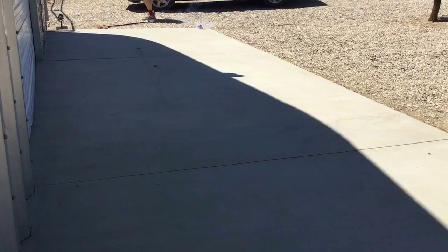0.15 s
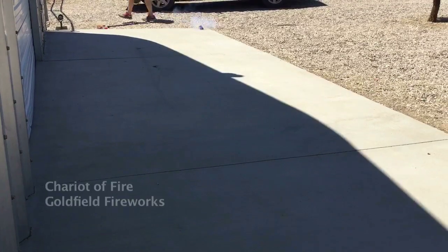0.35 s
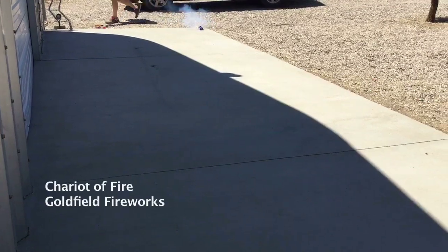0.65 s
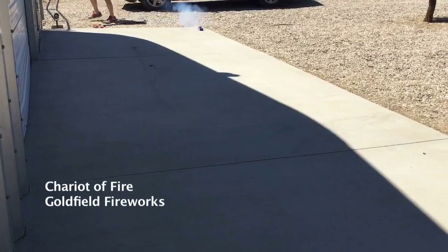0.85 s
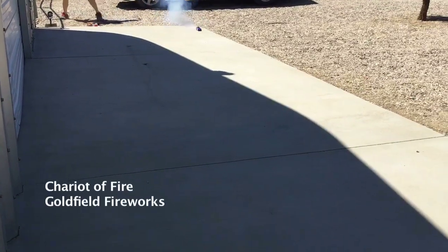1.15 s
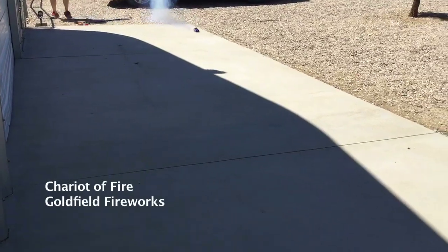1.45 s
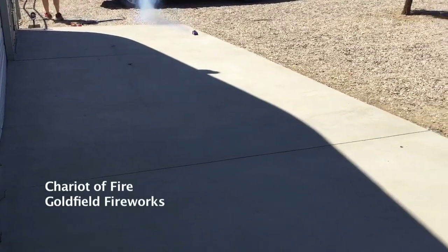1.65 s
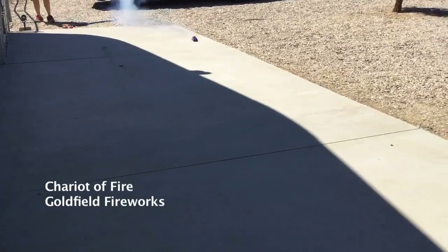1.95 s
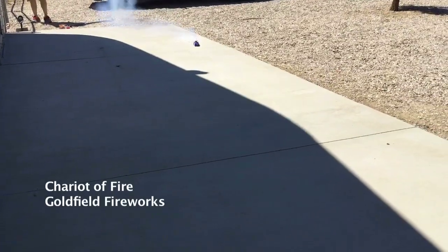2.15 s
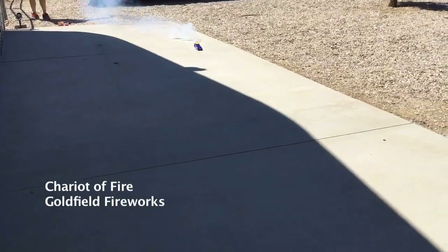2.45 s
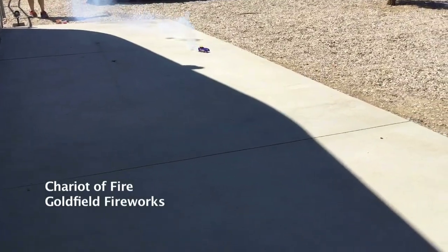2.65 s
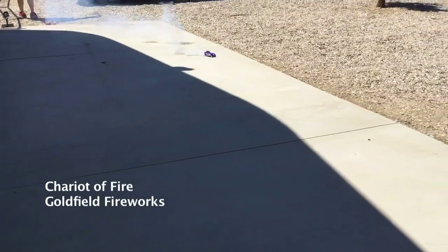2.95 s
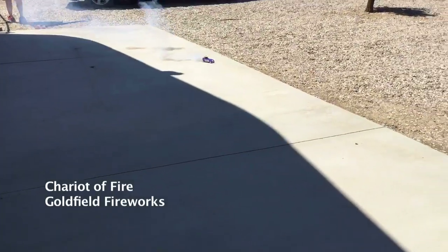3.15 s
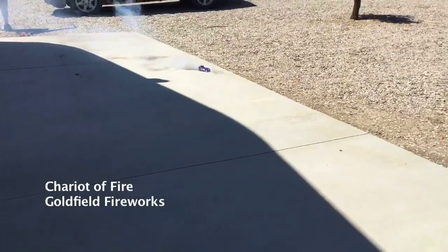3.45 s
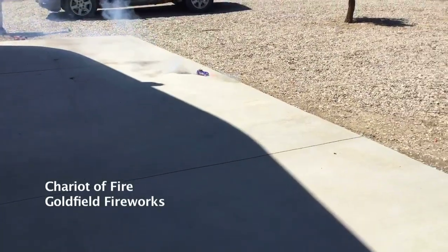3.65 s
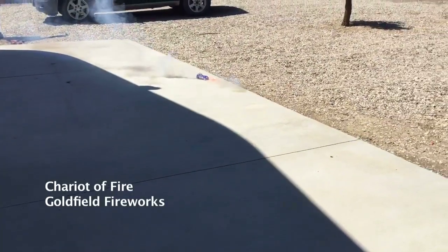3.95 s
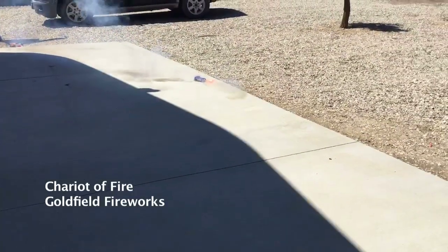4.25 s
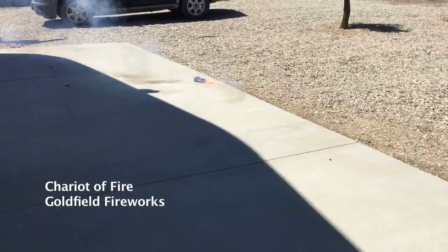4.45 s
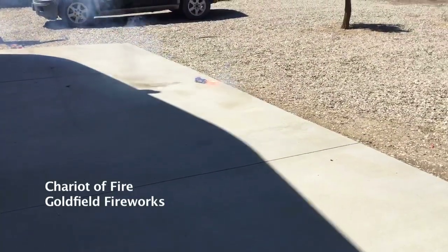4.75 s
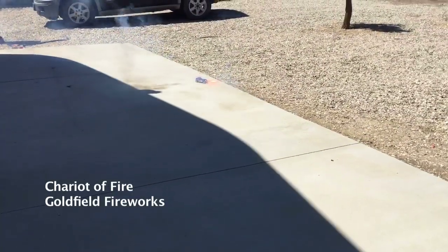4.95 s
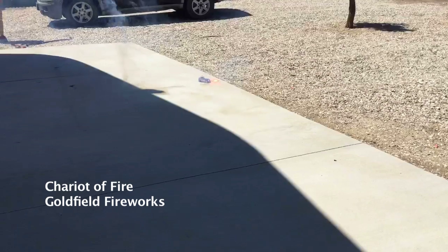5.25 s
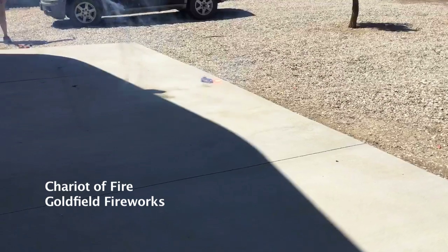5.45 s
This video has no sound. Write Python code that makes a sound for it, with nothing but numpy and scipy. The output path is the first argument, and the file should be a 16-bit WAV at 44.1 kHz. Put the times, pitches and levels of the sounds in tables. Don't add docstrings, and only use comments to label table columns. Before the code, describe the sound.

Loud, rough firework whistle falls in pitch for two seconds and stops short, leaving echoes, faint gas hiss, small pops, wind buffets and late bird chirps.

```python
import sys
import numpy as np
from scipy import signal
from scipy.fft import rfft, irfft, next_fast_len
from scipy.io import wavfile
from scipy.ndimage import uniform_filter1d

SR = 44100
rng = np.random.default_rng(int(sys.argv[2]) if len(sys.argv) > 2 else 0)


def volts_from_db(level):
    exponent = np.asarray(level, float) / 20
    return 10 ** exponent


def transcribe(signal):
    frames = np.atleast_2d(signal).T
    limited = np.clip(frames, -1, 1)
    pcm = np.round(limited * 32767).astype(np.int16)
    wavfile.write(sys.argv[1], SR, pcm)


N = 246492
T = np.arange(N) / SR
LIT_S, CHOKE_S, OUT_S = .105, 2.052, 2.095


def curve(table, silent=None):
    s, *columns = np.transpose(table)
    return [np.interp(T, s, c, silent, silent) for c in columns]


def unit(x):
    return x / np.sqrt(np.mean(x ** 2))


def colour(x, shape):
    hz, db = np.transpose(shape)
    bins = np.arange(len(x) // 2 + 1) * SR / len(x) + 1
    gain = volts_from_db(np.interp(np.log(bins), np.log(hz), db))
    return irfft(rfft(x) * gain, len(x))


def walk(rate):
    hold = int(SR / rate)
    steps = np.repeat(rng.standard_normal(N // hold + 1), hold)
    return unit(uniform_filter1d(uniform_filter1d(steps, hold), hold)[:N])


def bumps(rows):
    return sum(size * np.exp(-((T - s) / width) ** 2) for s, size, width in rows)


def spurt(start, length, sag_db, attack, release):
    t = T - start
    rise = np.clip(t / attack, 0, 1)
    sag = volts_from_db(-sag_db * np.clip(t / length, 0, 1))
    return rise * sag * np.exp(-np.maximum(t - length, 0) / release)


def turbulence(shape, flicker_db, rate):
    out = 0
    for hz in 30 * 2. ** np.arange(10):
        octave = [(hz / 2, -60), (hz / 1.6, -9), (hz / 1.25, 0),
                  (hz * 1.25, 0), (hz * 1.6, -9), (hz * 2, -60)]
        band = colour(rng.standard_normal(N), octave)
        out = out + band * volts_from_db(flicker_db * walk(rate))
    return unit(colour(out, shape))


# [f/Hz, level/(dB per Hz)]
STREET_HISS = [(300, -8), (800, -4), (3000, 0), (6500, -14), (11000, -10.5), (14000, -24.5), (15700, -38)]


def street():
    return volts_from_db(-57.5) * turbulence(STREET_HISS, 0.97, 6.6)


# [t/s, level/dB, deep part minus level/dB]
GUSTS = [(0, -49, 6), (.85, -46, 3.5), (1.05, -49, -17.5), (2, -49.5, -11.5), (2.7, -47, -1),
         (3.8, -47.5, -7), (4.2, -41.5, -14), (4.9, -44.5, -5.5), (5.1, -41, -9), (5.35, -45, -11),
         (5.59, -42.5, -13)]
# [f/Hz, level/(dB per Hz)]
WIND_RUMBLE = [(25, -35.5), (50, -7.5), (100, -2.5), (161, -1), (287, -3.5), (386, -13), (450, -20.5),
               (800, -36.5)]
# [t/s, peak level/dB, f/Hz]
BUFFETS = [(1.622, -39, 58.4), (1.907, -42, 51.1), (2.075, -31.5, 178), (2.776, -35, 81),
           (3.254, -29.5, 80), (3.726, -27, 103), (3.745, -25.5, 79.5), (3.914, -29.5, 57.7),
           (4.549, -33.5, 108), (4.769, -32, 156.6), (5.12, -28, 61.9), (5.348, -29.5, 64.2),
           (5.461, -28.5, 180), (5.561, -29.5, 110.3)]


def wind():
    gust_db, deep_db = curve(GUSTS)
    rumble = turbulence(WIND_RUMBLE, 2.3, 12)
    deep = turbulence([(25, -25), (60, 0), (110, -6), (200, -30)], 2.0, 10)
    out = volts_from_db(gust_db) * (rumble + volts_from_db(deep_db - 9.5) * deep)
    for s, db, hz in BUFFETS:
        turns = (T - s) * hz
        out = out + volts_from_db(db) * np.sin(2 * np.pi * turns) * np.exp(-((turns - .6) / 0.77) ** 2)
    return out


# [t/s, length/s, centre f/Hz, swing f/Hz, level/dB]
CHIRPS = [
    (4.79, .075, 3020, 400, -57),
    (5.43, .054, 4200, 850, -52),
    (5.49, .04, 3350, 500, -54),
]


def bird():
    swing_turns, settle_share, glide_db = 1.17, .35, -8
    out = 0
    for s, length, centre_hz, swing_hz, db in CHIRPS:
        u = np.clip((T - s) / length, 0, 1)
        angle = 2 * np.pi * swing_turns * u
        hz = centre_hz - swing_hz * (1 - settle_share * u) * np.cos(angle)
        level = volts_from_db(db + 2.0 * walk(150) + glide_db * np.sin(angle) ** 2)
        swell = np.sin(np.pi * u ** 1.44) ** 0.53 * (u < 1)
        out = out + level * swell * np.sin(2 * np.pi * np.cumsum(hz) / SR)
    return out


# [t/s, peak level/dB, centre f/Hz]
SPARKS = [(.106, -30, 900), (.111, -22, 1600), (.122, -22, 1700), (2.066, -30, 1500), (2.072, -33, 500),
          (2.081, -31, 350), (2.092, -35, 300), (2.27, -40, 2000), (2.297, -34, 6000), (2.357, -28, 5000),
          (2.416, -33, 2600), (2.432, -37, 4000), (2.455, -39, 4000), (2.51, -39, 2500), (2.57, -32, 1800),
          (2.645, -32, 1700), (2.68, -33, 1900), (2.757, -38, 2000), (2.83, -37, 3000), (3.005, -39, 3000),
          (3.335, -34, 8000), (3.695, -36, 1800), (4.357, -30, 1300), (4.57, -39, 1500)]


def sparks():
    out = np.zeros(N)
    t = T[:SR // 50]
    for s, db, hz in SPARKS:
        burst = rng.standard_normal(len(t)) * np.exp(-t / .0014)
        pop = colour(burst, [(hz / 8, -40), (hz / 3, -8), (hz, 0), (hz * 2.2, -8), (hz * 6, -40)])
        out[int(s * SR):][:len(t)] += volts_from_db(db) * pop / np.abs(pop).max()
    return out


# [f/Hz, level/(dB per Hz)]
ROAR = [(200, -14), (560, 0), (900, -2.5), (1700, -3.5), (2900, -15.5), (4000, -13.5), (8000, -30.5),
        (12000, -55.5)]
# [f/Hz, level/(dB per Hz)]
HISS = [(1200, -31.5), (2500, -13), (4200, -6.5), (5200, -8), (6300, -4), (7500, -10), (9000, -11),
        (11400, -5), (13000, -18), (14500, -19), (15700, -46)]
# [f/Hz, level/(dB per Hz)]
FLAME = [(150, -15), (400, -17), (1000, -2), (2000, -0.5), (3500, 8), (6000, 0), (8500, -10), (11000, -8.5),
         (14000, -22.5), (15700, -33)]
# [t/s, length/s, roar level/dB, hiss level/dB, sag/dB]
SPURTS = [(-.05, 2.03, -58.5, -52, -4), (2.163, 0.28, -64.5, -63, -9.5), (2.474, 0.051, -55.5, -51.5, -3),
          (2.527, .49, -57, -50, 0.5), (3.027, 0.059, -61, -49.5, -8.5), (3.092, 0.28, -48, -39.5, 12),
          (3.323, 0.21, -52, -45.5, 5.5), (3.51, 0.11, -51.5, -43, 1), (3.681, 0.064, -41.5, -57.5, 2.5),
          (3.82, 0.75, -42, -59, 8), (4.597, 0.44, -57.5, -59, 1.5), (5.1, .4, -60, -69.5, 0.5),
          (5.54, .06, -56, -73, 1)]


def jet():
    flows = np.array([spurt(s, length, sag_db, .035, .055) for s, length, _, _, sag_db in SPURTS])
    roar_gain, hiss_gain = np.sqrt(volts_from_db(np.transpose(SPURTS)[2:4]) ** 2 @ flows ** 2)
    lighting_puff = volts_from_db(-20.5) * spurt(LIT_S, 0.048, 3, 0.015, 0.0057)
    burning = volts_from_db(-38.5) * spurt(LIT_S, CHOKE_S - LIT_S + 0.008, -3.5, .1, 0.006)
    last_puff = volts_from_db(-38) * spurt(CHOKE_S + .008, .025, 3, .008, .022)
    flame_gain = lighting_puff + burning + last_puff
    bright_s = 1.25
    hiss_gain = hiss_gain + volts_from_db(-39.5) * spurt(bright_s, CHOKE_S - bright_s, 0, .3, .015)
    grit = volts_from_db(2.0 * walk(900) + 1.2 * walk(25.06))
    roar = roar_gain * turbulence(ROAR, 1.0, 12)
    hiss = hiss_gain * turbulence(HISS, 1.2, 15)
    flame = flame_gain * turbulence(FLAME, 1.5, 20)
    return grit * (roar + hiss + flame)


# [t/s, f/Hz, drive level/dB, unsteadiness of the burn (0-1)]
SONG = [
    (.2, 2472, -10, 0.47),
    (.45, 2322, -1.5, 0.69),
    (.6, 2303, 0.5, 0.6),
    (.69, 2205, -1, .6),
    (.83, 2184, -1, 0.9),
    (1.0, 2008, 0, 0.75),
    (1.3, 1803, -0.5, 0.7),
    (1.6, 1712, 0, 0.49),
    (2.03, 1628, -0.5, 0.43),
]
# [t/s, rise (share), half width/s]
FLARES = [
    (.31, .012, 0.056),
    (.742, .008, 0.028),
    (1.075, .048, 0.044),
    (1.23, 0.068, 0.044),
    (1.34, .008, 0.014),
    (2.03, 0.034, 0.013),
]
# [t/s, level/dB, half width/s]
BEATS = [(.28, -13, .012), (.372, 7, 0.0046), (.395, -11, 0.0027), (.45, -10.5, 0.018), (.5, 3.5, .015),
         (.525, -13, .008), (.595, -14, 0.002), (.713, -23, 0.0067), (.737, 8.5, 0.02), (.92, -8.5, 0.015),
         (1.22, -3.5, 0.018), (1.435, 2.5, 0.016), (1.58, 6, 0.037), (1.67, -7, 0.013), (1.93, 6, 0.058)]
MULTIPLE_DB = [-23.5, -12.5, -30.5, -32.5, -32.5, -25, -49.5, -33]
# [f/Hz, level/dB]
MOUTH = [(1500, -13), (3400, 1.5), (4600, -2), (6500, 6.5), (8500, -7.5), (10600, 0.5), (12200, -6),
         (14000, -23.5)]


def whistle():
    hz, drive_db, unsteady = curve(SONG)
    cold = np.exp(-np.maximum(T - LIT_S - .011, 0) / .02)
    spent = np.maximum(T - CHOKE_S, 0)
    choked = 1 - np.exp(-spent / .014)
    unsteady = np.maximum(unsteady + 0.44 * (np.sqrt(cold) + choked), 0)

    steady_hz = hz * (1 - .33 * cold - .035 * choked + bumps(FLARES))
    waver = .009 * walk(75) + .012 * unsteady ** 4 * walk(900)
    hz = steady_hz * (1 + unsteady * waver + 0.0045 * walk(500))
    phase = 2 * np.pi * np.cumsum(hz) / SR

    lit = uniform_filter1d(1. * (T > LIT_S) * (T < OUT_S), size=90)
    mouth_hz, mouth_db = np.transpose(MOUTH)
    odd_db = -42.5 * np.maximum(T - 1.19, 0) - 22 * cold
    out = 0
    for k, db in enumerate(MULTIPLE_DB, 1):
        db = db + drive_db - 9 * choked * np.sqrt(k / 2) - 200 * spent
        db = db + np.interp(np.log(k * steady_hz), np.log(mouth_hz), mouth_db)
        if k % 2:
            db = db + odd_db
        elif k == 2:
            db = db + bumps(BEATS) + 2.5 * cold
        else:
            db = db - 15 * cold
        flutter = 1.1 * walk(70) + 1.0 * walk(200) + .25 * k * walk(700)
        level = volts_from_db(db + np.sqrt(k * unsteady) * flutter)
        out = out + level * (k * hz < 15600) * np.sin(k * phase + k * k)
    return np.sqrt(2) * lit * out


# [t/s, distance/m]
DISTANCE = [
    (0, 20.4),
    (.5, 19.2),
    (1, 17.5),
    (1.7, 14.5),
    (3, 10.2),
    (3.8, 8),
    (4.3, 7.77),
]


def ground(x):
    bounce_gain, bounce_turn, lag_ms_m = .64, -1., 10
    turned = np.real(signal.hilbert(x, next_fast_len(N))[:N] * np.exp(-1j * bounce_turn))
    late = np.interp(T - lag_ms_m / curve(DISTANCE)[0] / 1000, T, turned)
    return x + bounce_gain * colour(late, [(500, -8), (1200, 0), (3000, 0), (7000, -2), (13000, -6)])


# [lag t/s, level/dB]
FRONT = [
    (.0062, -8),
    (.0137, -10),
]


def yard(x, song):
    t60_s, tail_db = .68, -18
    t = T[:SR]
    tail = rng.standard_normal(SR) * volts_from_db(-60 * t / t60_s + 2.5 * walk(70)[:SR]) * (t > .02)
    tail = colour(tail, [(200, -8), (3000, -15.5), (7000, -13.5), (10000, -23), (14000, -21)])
    far = signal.fftconvolve(x, volts_from_db(tail_db) * tail / np.sqrt(np.sum(tail ** 2)))[:N]
    near = sum(volts_from_db(db) * np.pad(song, (int(lag * SR), 0))[:N] for lag, db in FRONT)
    return x + near + far * volts_from_db(3.5 * walk(70))


def scene():
    song = whistle()
    cart = song + ground(jet() + sparks())
    return (yard(cart + bird(), song) + wind() + street())[None]


def masked(x):
    mask_db, slope_per_band_db, least_hidden_db = -28, -3.6, -52
    spec = signal.stft(x, nperseg=2048, noverlap=1024)[2]
    bands = np.abs(spec[:1024]).reshape(64, 16, -1).max(axis=1)
    hidden = np.zeros_like(bands)
    for step in range(2, 14):
        slope_db = slope_per_band_db * 14 / np.arange(step, 64)[:, None] ** 1.2 * 1.5
        shadow = bands[:-step] * volts_from_db(mask_db + slope_db * (step - 2.0))
        hidden[step:] = np.maximum(hidden[step:], shadow)
    hidden = uniform_filter1d(hidden, size=3, axis=1)
    keep = np.repeat((bands > hidden) | (hidden < volts_from_db(least_hidden_db)), 16, axis=0)
    keep[:190] = True
    keep = np.vstack([keep, keep[-1:]])
    return signal.istft(spec * keep, nperseg=2048, noverlap=1024)[1][:N]


def band_limit(x):
    return signal.sosfilt(signal.butter(12, 15700, fs=SR, output="sos"), x)


def record(dry):
    heard = colour(dry[0], [(15, -19.0), (40, -1.0), (70, 1.5), (12000, 0), (14000, -2.5), (15700, -9.5)])
    rounded = np.tanh(1.04 * heard) / 1.159
    return band_limit(masked(rounded)[None])


dry = scene()
out = record(dry)
transcribe(out)
```